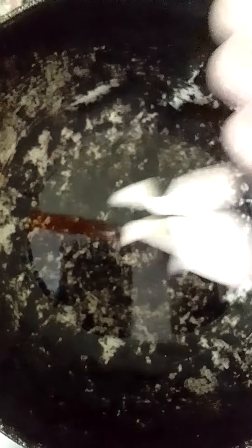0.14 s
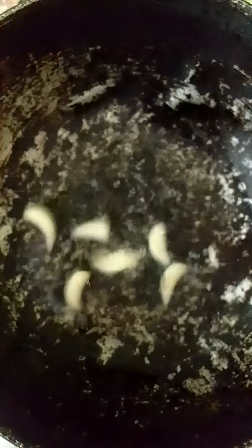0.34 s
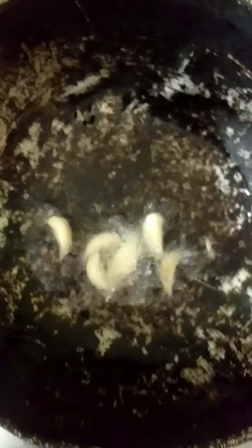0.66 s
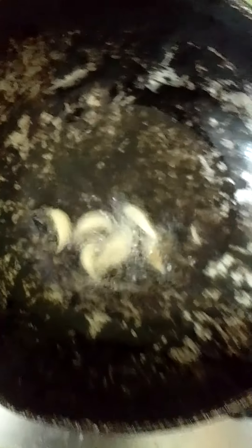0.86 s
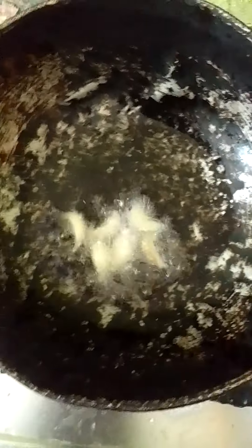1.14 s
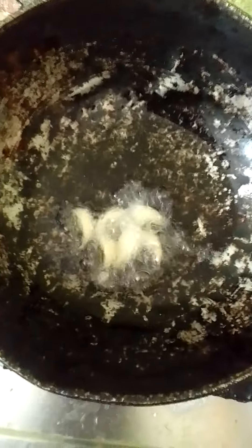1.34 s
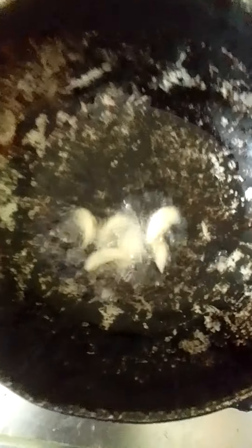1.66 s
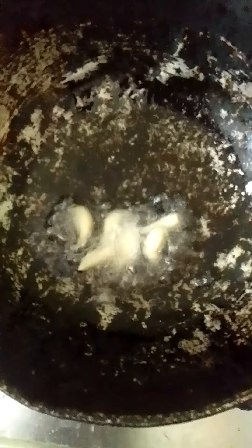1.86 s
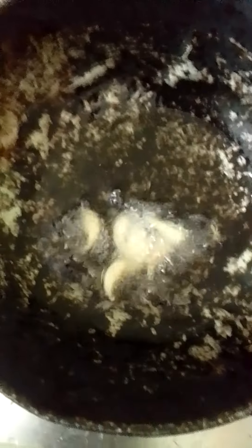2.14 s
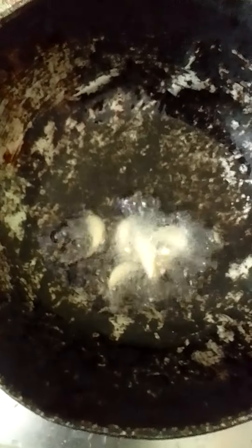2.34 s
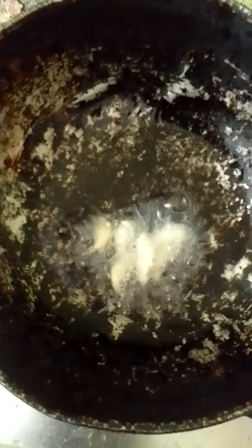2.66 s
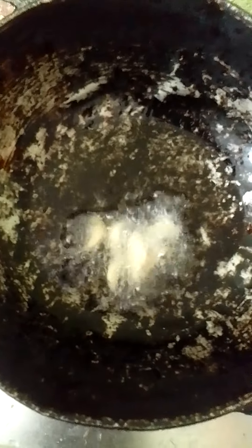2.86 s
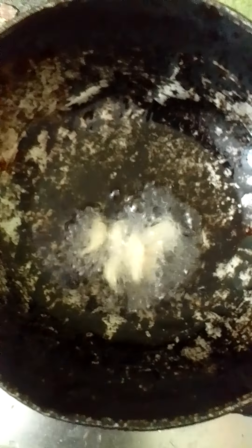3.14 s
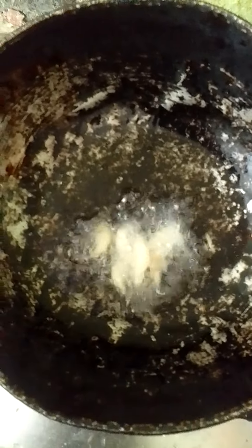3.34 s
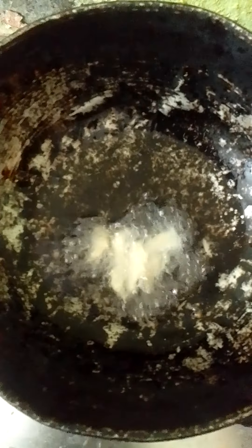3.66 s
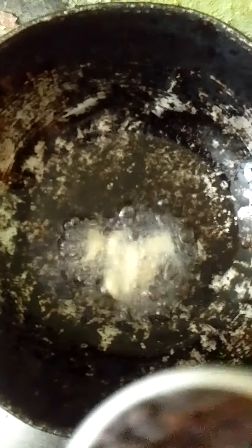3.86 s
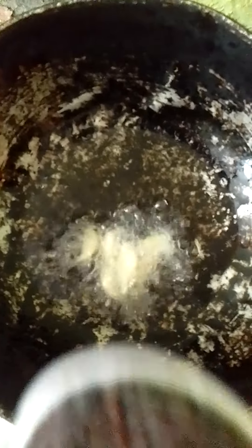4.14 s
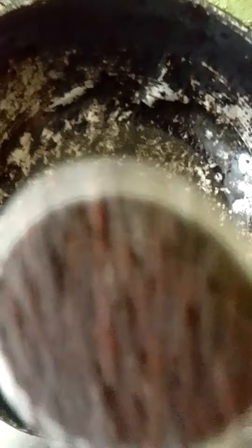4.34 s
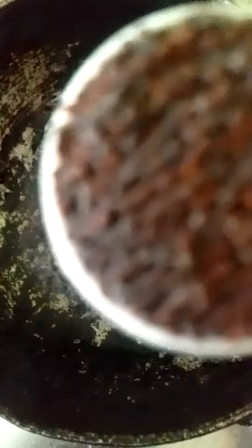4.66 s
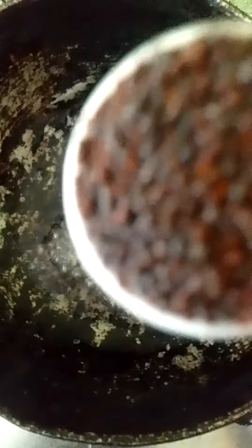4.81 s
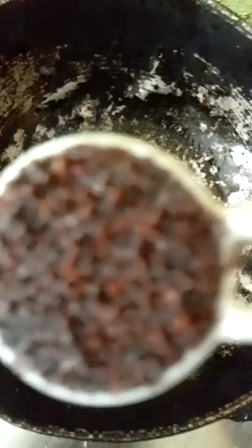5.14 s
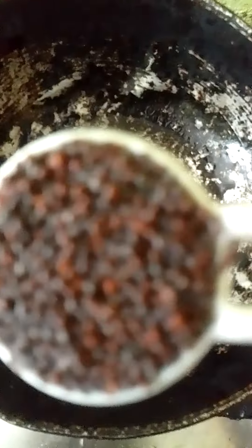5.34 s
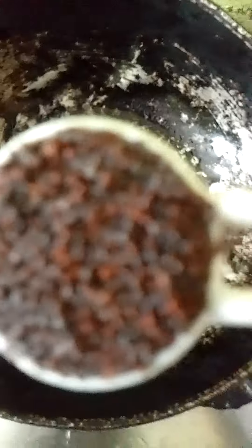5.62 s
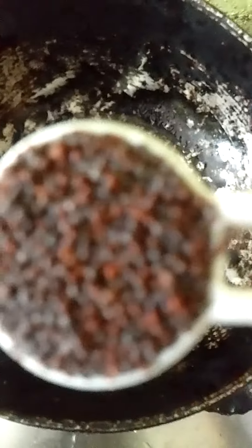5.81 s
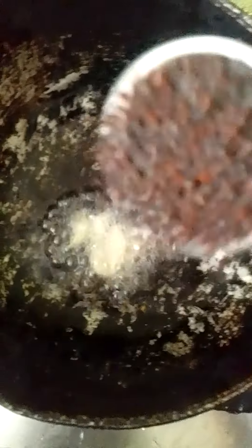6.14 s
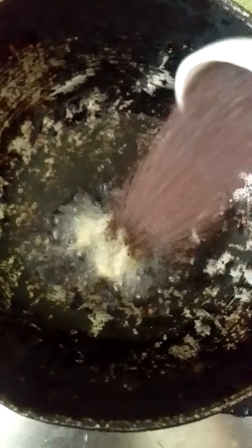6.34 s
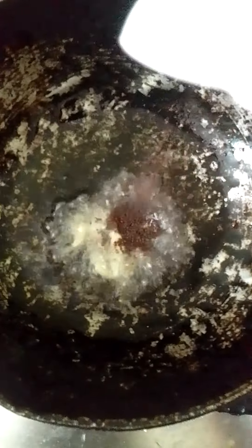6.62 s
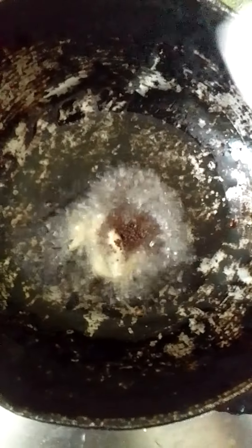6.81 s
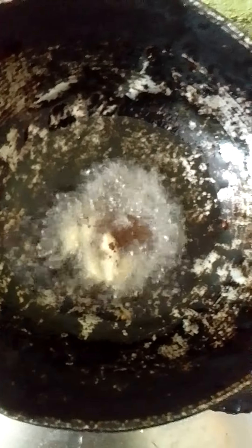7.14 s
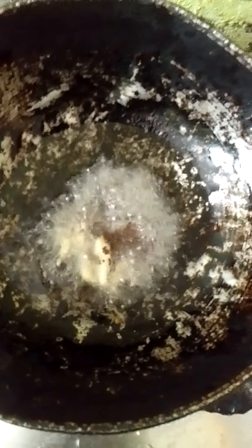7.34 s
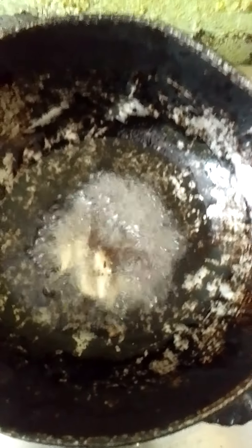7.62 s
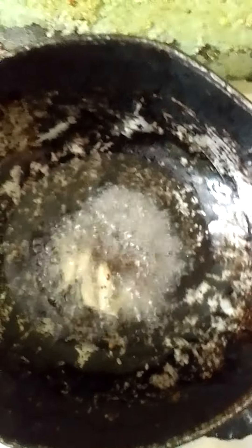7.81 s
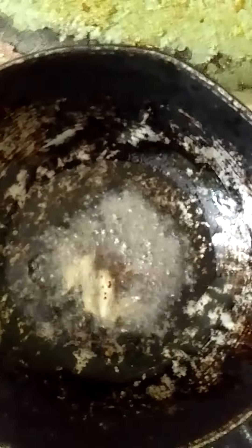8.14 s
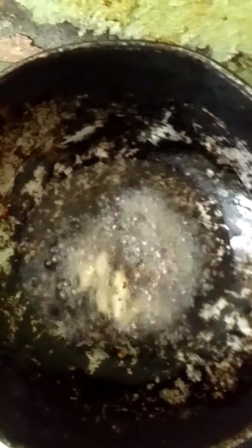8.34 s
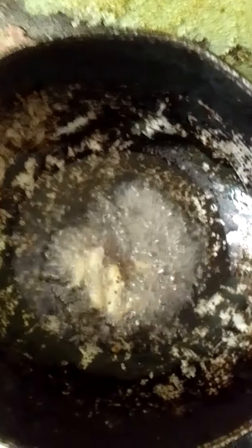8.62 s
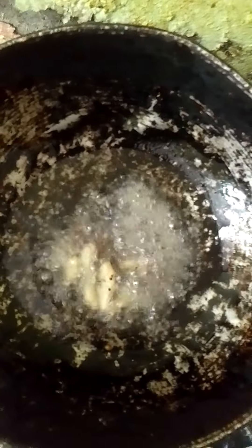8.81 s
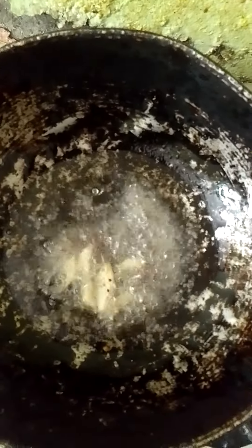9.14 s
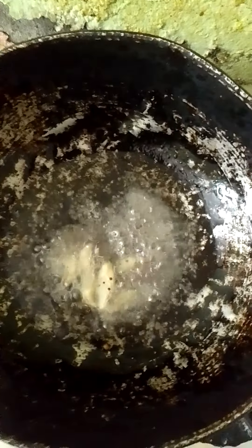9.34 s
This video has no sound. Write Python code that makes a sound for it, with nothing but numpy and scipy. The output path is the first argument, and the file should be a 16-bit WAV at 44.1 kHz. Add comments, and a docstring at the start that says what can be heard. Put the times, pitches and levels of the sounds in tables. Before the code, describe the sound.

Garlic drops into hot oil in a deep iron pan, with an immediate dense, bright crackle and fizz. Within a second or two it thins to irregular snapping pops over a light sizzle. Seeds poured in later bring a thicker, busier crackle, which gradually sparsens. The small microphone is very close; a small kitchen adds short echoes, and a low wavering rumble lies faintly behind.

```python
"""Garlic, then a spoonful of seeds, fry in hot oil in a deep iron pan close under a small microphone.
Steam bubbles burst as short resonant pops; many smaller ones make a dense crackle, and shaped noise a fine fizz.
The air in the bowl of the pan rings with them and a small kitchen answers with decaying echoes.
Behind, filtered noise makes a low rumble, wavering drones and a faint hiss; one soft low tone swells,
and two splashes push air at the microphone as one-sided pulses."""
import sys
import numpy as np
from scipy import signal
from scipy.fft import rfft, irfft, next_fast_len
from scipy.io import wavfile
from scipy.ndimage import uniform_filter1d

SR = 44100
rng = np.random.default_rng(int(sys.argv[2]) if len(sys.argv) > 2 else 0)


def pcm_store(signal):
    """Save signal as 16-bit PCM."""
    levels = np.round(np.clip(np.atleast_2d(signal), -1, 1) * 32767)
    wavfile.write(sys.argv[1], SR, levels.astype(np.int16).T)


N = 417627

# Course of the frying. Each row: time in seconds, fizz level in dB, bowl murmur level in dB, crackle level in dB.
FRYING_COURSE = [(0, -39, -45.5, -33), (.6, -41.5, -52, -39), (.9, -45.5, -54, -41.5), (1.6, -55, -48, -43),
                 (2.4, -56.5, -53, -46.5), (3.2, -58, -56.5, -52.5), (3.5, -52.5, -55, -50),
                 (3.75, -55, -59, -55.5), (4.4, -57.5, -56.5, -54), (4.65, -52, -49, -45.5),
                 (4.95, -55, -59.5, -56.5), (5.45, -55.5, -51, -51.5), (6.0, -59, -55.5, -53.5),
                 (6.17, -53, -52, -45.5), (6.9, -55.5, -55.5, -45), (7.3, -50, -52.5, -48),
                 (7.75, -58, -60.5, -49.5), (8.0, -56, -49, -44), (8.3, -54.5, -58.5, -50),
                 (8.75, -58, -69, -56), (9.47, -56.5, -89, -60.5)]


def pops():
    """Superposition: the large bubbles add as separate transients, each at its own moment."""
    # The loudest bursts. Each row: start in seconds, peak of the snap in dB, bubble pitch in Hz,
    # broad crack in dB relative to the bubble, bowl ring and spray in dB relative to the snap's peak.
    large_bursts = [(0.0022, -20.5, 6300, -24, 1.5, -21), (0.0173, -19, 3860, -19, -5, -17),
                    (0.0448, -20.5, 4880, 3, 1.5, -24), (0.0611, -17.5, 6200, -26, -7.5, -26),
                    (0.081, -24, 4530, -8, -19, -28), (0.0754, -19, 2930.0, 13, -5, -24),
                    (0.138, -14.5, 4070, -12, -33, -31), (0.153, -20, 6200.0, -28, -24, -26),
                    (0.185, -15.5, 4400, -18, -28, -26), (0.2204, -13.5, 3170, -11, -25, -26),
                    (0.2451, -19.5, 3470, -3, -5.5, -27), (0.3075, -20, 5600, -23, -23, -26),
                    (0.332, -16, 5800, -11, -9, -26), (0.3394, -16, 3630, -22, -20, -30),
                    (0.355, -21, 4200, -15, -22, -30), (0.3834, -21, 3640, -6, -22, -26),
                    (0.393, -16, 3900, -1, -24, -26), (0.402, -14, 5000, 0, -18, -26),
                    (0.418, -15, 4310.0, 8, -9, -25), (0.4413, -26, 2400, -5, 1.5, -26),
                    (0.4623, -14.5, 5650, -8, -7, -17), (0.5129, -12.5, 5060, 10, -6, -24),
                    (0.523, -21, 5100, -11, -10, -26), (0.5545, -19, 5400, -7, -16, -26),
                    (0.583, -18, 2980, 11, -15, -26), (0.593, -23, 3700, 8, -1, -24),
                    (0.601, -22, 4030, -4, -16, -26), (0.609, -23, 3500, 9, -6, -26),
                    (0.614, -28.5, 3800, -6, 6, -22), (0.618, -20.5, 1240, -34, -10, -30),
                    (0.635, -22, 5000, -20, -20, -26), (0.6724, -20, 5760, -29, -28, -26),
                    (0.6885, -14, 3640, 1, -32, -27), (0.725, -10.5, 2600, 9, -11, -18),
                    (0.7604, -16, 3900, -12, -17, -26), (0.7796, -25.5, 8100, -30, -22, -24),
                    (0.806, -34, 4070, -7, 1, -26), (0.826, -16.5, 3880, 3, -11.5, -28),
                    (0.8664, -25, 7150, -28, -26, -26), (0.8934, -28, 7100, -29, -26, -26),
                    (0.9112, -29.5, 2450, 2, 10.5, -26), (0.919, -23.5, 5360, -26, -10, -26),
                    (0.9328, -16, 3300, 9, -2.5, -27), (0.9453, -17.5, 6600, -16, -2, -6),
                    (0.967, -20, 8050, -31, -12, -28), (0.9867, -15, 3660, -3.5, -21, -31),
                    (1.0487, -31.5, 5270, -23, 1.5, -26), (1.111, -24, 7540, -8, -14, -22),
                    (1.13, -11.5, 5370, -5, -19, -28), (1.133, -20, 3620, -14, -25, -26),
                    (1.141, -24, 3000, -2, 2.5, -26), (1.18, -14.5, 3620.0, 1, -3.5, -25),
                    (1.21, -24, 4940, -16, -28, -28), (1.2248, -27, 3620.0, 4, -1, -20),
                    (1.247, -16, 5510.0, -30, -25, -14), (1.2685, -18, 2930.0, 13, 2, -20),
                    (1.258, -25, 4830, -23, -24, -26), (1.275, -19.5, 5000, -15, -27, -26),
                    (1.286, -21.5, 7300, -27, -24, -26), (1.299, -24.5, 4940, -24, -25, -24),
                    (1.317, -30.5, 2040, -15, 16.5, -24), (1.324, -31, 900, -33, 3, -30),
                    (1.3765, -31, 3700, -7, -14, -26), (1.383, -27, 1270, -36, -3, -26),
                    (1.3969, -19, 2070, -5, 6, -21), (1.406, -19.5, 5200, -20, -16, -13),
                    (1.4264, -23, 5100, -22, -31, -24), (1.447, -22, 3620.0, 1, -19, -28),
                    (1.4526, -27, 3730, -11, -18, -26), (1.461, -21, 3800, 4, -18, -13),
                    (1.51, -19, 8790.0, -6.5, -9, -22), (1.5246, -27, 3750, -15, -22, -28),
                    (1.5418, -25.5, 2040, 3, 9, -32), (1.5475, -37, 850, -33, -12, -30),
                    (1.567, -20, 4900, -28, -20, -27), (1.585, -23, 7700, -28, -22, -24),
                    (1.6027, -23, 2040, -3, 4, -20), (1.6217, -19.5, 5960, -29, -31, -25),
                    (1.6426, -11.5, 2200, 8, -5, -17), (1.7102, -21.5, 6000, -5, -11, -18),
                    (1.8018, -18, 8000, 0, -29, -18), (1.8211, -13.5, 2030, 0.5, -5, -20),
                    (1.8467, -21, 4930, -6, -2, -26), (1.867, -18.5, 7850, 0, -1, -24),
                    (1.9104, -19, 8400, -3.5, 0, -21), (1.933, -21, 2220, 0, -9, -33),
                    (1.9458, -21, 5330, -7, -18, -23), (2.026, -20, 3340, -19, -7.5, -30),
                    (2.035, -23.5, 9300, -7.5, -6, -26), (2.167, -14, 2430, 9, -9.5, -23),
                    (2.2016, -20, 3430, 5, -6, -29), (2.238, -21.5, 4440, -32, -32, -31),
                    (2.274, -13, 8000, 9, -5, -22), (2.3044, -17.5, 7040, -1, -7, -19),
                    (2.38, -14.5, 2100, 9, -9.5, -18), (2.39, -26, 2930.0, -9, -2, -16),
                    (2.4389, -14, 7700, -4.5, -9, -13), (2.505, -26, 7750.0, -2, -11, -23),
                    (2.5285, -27, 5600, -23, -30, -20), (2.5588, -23.5, 2570, -4, -9, -16),
                    (2.5758, -27, 8100.0, 4, -1, -14), (2.5944, -20.5, 3560, -11, -12.5, -18),
                    (2.675, -29, 3960, 1, -6, -24), (2.7004, -13.5, 4820, 14, -5.5, -19),
                    (2.8113, -29, 2400, 0, -4, -29), (2.861, -30.5, 8400, -16, -10, -22),
                    (2.8851, -15.5, 3730, -3, -24, -34), (2.9164, -19.5, 7850, -4.5, -10, -18),
                    (2.9933, -28, 5940, -34, -28, -26), (3.138, -21.5, 6370.0, 13, -10, -22),
                    (3.225, -28, 6900, -29, -28, -34), (3.235, -24.5, 5550, -14, -34, -26),
                    (3.2707, -18.5, 3650, 10, -14, -23), (3.4139, -12, 8500, 11, -9, -25),
                    (3.606, -23.5, 6370.0, -6.5, -8.5, -30), (3.7104, -26.5, 7060, -33, -28, -32),
                    (3.8, -28.5, 6600, -17, -22, -18), (3.8084, -26.5, 3350, -10, -14, -34),
                    (3.8287, -27, 3600, -7, -9, -9), (3.8752, -10.5, 4200, 0, -3.5, -24),
                    (3.996, -30.5, 7540, -2, -20, -11), (4.125, -30, 8700, -30, -7, -20),
                    (4.187, -27.5, 3020, 0, -12, -24), (4.214, -27, 9000, -2, -12, -12),
                    (4.2633, -30, 2390, -24, -5, -33), (4.31, -26, 5140, -25, -12.5, -28),
                    (4.323, -29.5, 8200, -28, -14, -33), (4.396, -25.5, 3800, 16, -8.5, -17),
                    (4.434, -27, 2960, -18, -5.5, -38), (4.5746, -30, 8000, -8, -20, -6),
                    (4.6487, -27, 8300, -27, -26, -25), (4.716, -21.5, 2500, -3.5, -1, -12),
                    (4.751, -17.5, 2930.0, 9, -17, -22), (4.8278, -26, 7000, -30, -32, -21),
                    (5.0634, -25.5, 6600, -19, -34, -51), (5.171, -41, 8000, -2, -25, -10),
                    (5.315, -24.5, 4020, 8, -11, -37), (5.3902, -12.5, 2570, -1.5, -3, -14),
                    (5.471, -26, 3100, -8.5, -21, -37), (5.4968, -20, 5800, 8, -10, -17),
                    (5.5416, -21.5, 8790.0, 3, -14, -20), (6.059, -22, 5000, -8.5, -23, -23),
                    (6.1356, -22.5, 7300, -6, -13, -22), (6.1677, -16.5, 6900, 0, -12, -23),
                    (6.187, -21, 5670, -11, -13, -19), (6.214, -22, 5600, -10, -21, -30),
                    (6.238, -12.5, 4480.0, -2, -20, -20), (6.3172, -23, 5100, -9, -18, -32),
                    (6.365, -22.5, 3900, -5, -24, -28), (6.375, -39, 8000, 0, -25, 2),
                    (6.3848, -24, 2820, -12, -7, -26), (6.4217, -22, 3640, 0, -18, -22),
                    (6.483, -29, 4800, -4, -22, -28), (6.51, -18, 7060.0, 7, -22, -31),
                    (6.538, -21, 3820, 0, -24, -7), (6.5457, -18.5, 3770, -7, -18, -30),
                    (6.582, -23.5, 3330, -26, -31, -39), (6.609, -27, 5000, -16, -27, -28),
                    (6.6204, -19, 3200, -11, -18, -21), (6.645, -19, 3870, -5.5, -22, -29),
                    (6.6909, -24, 4820, -17, -25, -28), (6.725, -26, 3800, -7, -17, -30),
                    (6.7403, -21, 3200, -9, -15, -30), (6.759, -21.5, 3790.0, -10, -31, -27),
                    (6.809, -23.5, 4330, -14, -22, -14), (6.823, -15, 6200.0, 3, -31, -31),
                    (6.856, -21, 2580.0, 0, -30, -22), (6.8746, -20, 4030, -7.5, -21.5, -29),
                    (6.884, -24, 5510.0, 2, -24, -32), (6.9627, -27, 5560, -13, -19, -26),
                    (6.9897, -22, 9200, -5, -12, -11), (7.0113, -27, 7580.0, 2, -11, -4),
                    (7.0298, -18.5, 3830, 0, -22, -28), (7.036, -23, 5500, -1, -24, -28),
                    (7.046, -24.5, 3480, -13, -12, -28), (7.078, -27, 4800, -9, -26, -28),
                    (7.1018, -22, 3020, -10, -15, -12), (7.1231, -19.5, 2860, -7, -18, -22),
                    (7.15, -23.5, 2260, -7, -20, -36), (7.1673, -23.5, 3440, -14, -22, -28),
                    (7.177, -28, 3480, -9, -20, -28), (7.193, -27, 3580, -26, -28, -32),
                    (7.223, -21, 4310.0, 0, -38, -29), (7.2419, -13.5, 3880, 10, -13, -21),
                    (7.254, -21, 4670, -3, -26, -26), (7.27, -21, 4400, -15, -39, -11),
                    (7.3135, -18, 4230, -9, -17, -20), (7.345, -27, 4030, -18, -21, -28),
                    (7.3562, -21.5, 2930.0, -5.5, -20, -23), (7.3918, -19.5, 3720, -4, -35, -29),
                    (7.402, -21, 6000, -7, -28, -24), (7.432, -24, 5000, -4, -28, -26),
                    (7.442, -23, 3760, -11, -36, -31), (7.464, -23, 1760, -13, -7, -8),
                    (7.52, -23, 3030, -11, -28, -27), (7.557, -20, 3770, 0, -15, -28),
                    (7.592, -17.5, 4570, 5, -21, -28), (7.642, -26.5, 4840, -8, -26, -28),
                    (7.815, -23, 5510.0, -1, -23, -24), (7.8653, -23.5, 2300, -5, -32, -15),
                    (7.907, -24, 3300, -19, -31, -32), (7.936, -17.5, 3700, -8, -28, -27),
                    (7.9488, -19.5, 2100, -4, -11, -28), (7.9936, -18.5, 3030, -8, -26, -28),
                    (8.0099, -31, 7000, 2, -25, 0), (8.0355, -19.5, 3220, -14.5, -25, -28),
                    (8.0606, -22, 4200, -11, -26, -23), (8.083, -19.5, 8500, 2, -13, -12),
                    (8.138, -14, 3970, 10, -38, -27), (8.1827, -20.5, 7920.0, 10, -23, -22),
                    (8.191, -21, 6000, -3, -25, -16), (8.209, -16, 3750, 0, -18, -22),
                    (8.3088, -22, 4830, -13, -28, -13), (8.4084, -21.5, 1520, -19, -8, -4),
                    (8.487, -34, 2670, -11, -16, -24), (8.5316, -20, 2970, -5, -20, -33),
                    (8.598, -17.5, 9000, -1.5, -19, -14), (8.6722, -20.5, 2060, -4, -10, -11),
                    (8.7034, -27.5, 3940, -8, -20, -30), (8.7241, -27.5, 7200, -10, -21, -4),
                    (8.7887, -23, 7000, -6, -32, -7), (8.816, -24.5, 6400, -36, -37, -14),
                    (8.906, -25, 2460, -14, -39, -39), (8.9699, -22.5, 4630, -7, -18, -7),
                    (9.005, -28.5, 4300, -7, -18.5, -22), (9.145, -31, 9000, 6, -33, -1),
                    (9.1503, -24, 3500, 1, -23, -15), (9.224, -25, 4000, -14, -21, -30),
                    (9.265, -29.5, 2250, -3, -11, -42), (9.29, -26.5, 7700, -9, -26, -28),
                    (9.344, -22, 3900, 3, -28, -27), (9.428, -33, 8000, -3, -35, -3)]
    start_s, peak_db, *kind = np.transpose(large_bursts)
    out = np.zeros(N)
    sounds = gain_of(peak_db)[:, None] * bursts(*kind)
    for start, sound in zip(start_s, sounds):
        add(out, start, sound)
    return out


def bursts(pitch_hz, crack_db, bowl_db, spray_db, size=1024):
    """Impulsive excitation: a tick and a ragged puff ring the bubble, knock the bowl and throw a fine spray."""
    # Colour of pan and microphone. Each row: frequency in Hz, relative level in dB per Hz.
    pan_colour = [(300, -38.5), (800, -19.5), (1500, -20.5), (1900, -13.5), (2450, -7), (3060, -7.5),
                  (3820, 0), (4260, -6.5), (6530, -8.5), (8750, -9.5), (9700, -23.5), (15400, -33.5)]
    t, hz = np.arange(size) / SR, rfft_hz(size)
    draws = rng.standard_normal((len(pitch_hz), size + 2))  # one row a burst
    grain, bowl_draw, fall_draw = draws[:, :size], draws[:, size:size + 1], draws[:, -1:]
    crack = gain_of(np.minimum(crack_db, 8))[:, None]

    # low bubbles last longer, cracks are over sooner
    fall_s = 0.0012 + 3.5 / pitch_hz[:, None] / (1 + 4 * crack)
    fall_s = fall_s * np.exp(0.35 * fall_draw)
    # pure bubbles swell, cracks start faster
    rise_s = 0.000057 + 0.00063 / (1 + 5 * crack)
    envelope = np.exp(-t / fall_s) * (1 - np.exp(-t / rise_s))
    ragged = rfft(grain * envelope)
    tick = 5.84 * np.minimum(crack, 1)  # a flat spectrum is an impulse
    puff = tick + ragged / (1 + 0.35 * crack)

    bubble = crack + peak(hz, pitch_hz[:, None], 0.16 * pitch_hz[:, None])
    snap = peaked(irfft(puff * bubble * causal(pan_colour, size)))
    knock = peaked(irfft(puff * bowl(hz, np.exp(0.075 * bowl_draw))))
    spray = irfft(ragged * peak(hz, 13500, 10400) ** 2)
    spray = peaked(spray * np.exp(-t / 0.0018))
    return snap - gain_of(bowl_db)[:, None] * knock + gain_of(spray_db)[:, None] * spray


def bowl(hz, stretch):
    """Modal sum: the air in the pan has broad modes, pitched a little differently from each spot."""
    # Modes of the air in the pan. Each row: frequency in Hz before the stretch, width in Hz, relative level in dB.
    air_modes = [(984, 207, 32), (1235, 37, 25.5), (430, 660, 17)]
    return sum(gain_of(db) * peak(hz, f * stretch, width) for f, width, db in air_modes)


def crackle(count=48):
    """Random point process: small bubbles of mixed size burst in short flurries; a few are louder."""
    per_second, flurry_s, flurry_db = 330, 0.02, 3.5  # mean rate, smoothing time, rms swing
    spread_db = np.array([9, 6, 7]) * rng.standard_normal((count, 3))
    crack_db, bowl_db, spray_db = ([-20, -20, -21] + spread_db).T
    shapes = bursts(np.geomspace(3100, 9200, count), crack_db, bowl_db, spray_db)

    swing = evened(uniform_filter1d(rng.standard_normal(N), round(flurry_s * SR)))
    flurry = gain_of(flurry_db * swing)
    rate = per_second * flurry / flurry.mean()
    happens = rng.random(N) < rate / SR
    strength = gain_of(6.0 * np.minimum(rng.exponential(1, N), 2.2)) * happens
    kind = rng.integers(0, count, N)
    out = sum(signal.oaconvolve(strength * (kind == k), shape)[:N] for k, shape in enumerate(shapes))
    return gain_of(curve(FRYING_COURSE, column=3)) * evened(out)


def fizz():
    """Dense superposition: countless tiny bubbles blend into a noise-like hiss and a murmur in the bowl."""
    # Spectrum of the hiss. Each row: frequency in Hz, relative level in dB per Hz.
    hiss_spectrum = [(820, -24), (1400, 3), (1690, -10.5), (2340, -2), (3030, 0), (3740, -0.5), (5260, -9),
                     (8700, -6), (9500, -14), (15400, -21)]
    # Spectrum of the murmur. Each row: frequency in Hz, relative level in dB per Hz.
    murmur_spectrum = [(640, -6), (850, -6), (990, 0.5), (1120, -1.5), (1280, 3), (1450, -14),
                       (1650, -10.5), (2100, -7)]

    def murmur_shape(hz):
        """Band limiting: the murmur drops by 60 dB outside 500 to 2600 Hz."""
        outside_db = -60 * (hz < 500) - 60 * (hz > 2600)
        return gain_of(read(murmur_spectrum, hz) + outside_db)

    hiss = noise(lambda hz: gain_of(read(hiss_spectrum, hz)), size=256, patchy_db=3.5, span=(6, 8))
    murmur = noise(murmur_shape, size=1024, patchy_db=4.0, span=(6, 8))
    hiss_gain, murmur_gain = (gain_of(curve(FRYING_COURSE, column)) for column in (1, 2))
    return hiss_gain * hiss + murmur_gain * murmur


def stirred(large):
    """Envelope following: a gain that jumps as each large burst stirs the fizz and sinks in the gaps."""
    fade_s, share = 0.017, 0.1  # decay time of the power, share of its dB swing
    keep = np.exp(-1 / (fade_s * SR))
    power = signal.lfilter([1 - keep], [1, -keep], large ** 2) + 1e-7
    level_db = 10 * np.log10(power)
    return gain_of(share * (level_db - uniform_filter1d(level_db, SR // 2)))


def pushes():
    """Aerodynamic pressure pulse: a one-sided slug of air reaches the microphone."""
    # Air from the splashes. Each row: start in seconds, peak in dB, sign (+1 push, -1 pull),
    # rise time constant in seconds, fall time constant in seconds.
    air_slugs = [(0.9491, -14.5, -1, 0.00032, 0.00013), (8.409, -10.5, 1, 0.00089, 0.0011)]
    t, out = np.arange(2000) / SR, np.zeros(N)
    for start_s, db, sign, rise_s, fall_s in air_slugs:
        slug = peaked((1 - np.exp(-t / rise_s)) ** 2 * np.exp(-t / fall_s))
        add(out, start_s, np.sign(sign) * gain_of(db) * slug)
    return out


def kitchen(x):
    """Reverberation: sparse decaying echoes of random sign, convolved with the direct sound."""
    # Near walls, then whole room. Each row: 60 dB decay time in seconds, level in dB.
    room_parts = [(0.05, -13.5), (.35, -15.5)]
    at, response = np.arange(160, 17980, 20), np.zeros(18000)  # samples
    for t60_s, db in room_parts:
        taps = np.zeros(len(response))
        jittered = at + rng.integers(0, 20, len(at))
        taps[jittered] = rng.choice([-1., 1.], len(at)) * gain_of(-60 * at / SR / t60_s)
        response += gain_of(db) * taps / np.linalg.norm(taps)
    return signal.oaconvolve(x, response)[:N]


def rumble():
    """Filtered noise: a broad low rumble and a few fuzzy drones come and go."""
    # Course of the low sound. Each row: time in seconds, then levels in dB of the broad rumble,
    # the lowest drone and the upper drones.
    low_course = [(0.0, -52, -73, -60), (0.84, -64, -60, -60.5), (1.08, -56, -68, -58),
                  (1.95, -59.5, -57.5, -53), (2.4, -56.5, -61.5, -60), (2.92, -58.5, -55, -55.5),
                  (3.11, -60.5, -56, -54), (3.51, -52.5, -52.5, -58), (3.85, -53, -50.5, -64),
                  (4.35, -56.5, -66, -52.5), (4.67, -46.5, -63, -50.5), (5.01, -54.5, -53, -55),
                  (5.46, -49, -54.5, -47), (5.91, -54, -59, -50), (6.09, -51.5, -53, -45.5),
                  (6.56, -53, -65, -57), (7.33, -56.5, -61.5, -57), (7.91, -55, -53.5, -47.5),
                  (9.07, -55, -65.5, -64), (9.47, -57, -69, -56)]
    # Spectrum of the broad rumble. Each row: frequency in Hz, relative level in dB per Hz.
    broad_spectrum = [(12, -36), (20, -13), (34, -8), (54, -12.5), (136, -6), (298, -17.5), (488, -16.5),
                      (588, -27), (800, -36), (1040, -78), (1760, -120)]
    # Drone resonances, lowest first. Each row: frequency in Hz, width in Hz, relative level in dB per Hz.
    drone_modes = [(105.8, 5.7, 0), (144.54, 5.2, 4), (180.3, 7, -5), (228.2, 55, -11.5),
                   (343.4, 10.6, -19), (484, 15, -17.5)]
    broad = noise(lambda hz: gain_of(read(broad_spectrum, hz)), size=2048, patchy_db=3.0, span=(4, 10))
    lowest, upper = hum(drone_modes[:1]), hum(drone_modes[1:])
    broad_gain, lowest_gain, upper_gain = (gain_of(curve(low_course, column)) for column in (1, 2, 3))
    return broad_gain * broad + lowest_gain * lowest + upper_gain * upper


def hum(modes):
    """Amplitude compression: each drone drifts in pitch on its own, with its swells partly evened out."""
    steadiness = 0.55  # 0 = a drone swells like noise, 1 = it nearly holds its level
    out = np.zeros(N)
    for hz, width_hz, db in modes:
        tone = wandering(drone(hz, width_hz))
        envelope = abs(signal.hilbert(tone, next_fast_len(N))[:N])
        held = evened(tone / (envelope + 0.05) ** steadiness)
        out += gain_of(db) * np.sqrt(width_hz) * held  # a wider band holds more power
    return evened(out)


def wandering(x):
    """Frequency modulation: a slowly drifting reading speed bends the pitch."""
    depth, drift_s = 0.03, 0.392  # share of the speed (rms), smoothing time
    span = round(drift_s * SR)
    drift = evened(uniform_filter1d(uniform_filter1d(rng.standard_normal(N), span), span))
    position = np.cumsum(1 + depth * (drift - drift.mean()))
    return np.interp(position, np.arange(N), x)


def drone(centre_hz, width_hz):
    """Narrow-band noise: random excitation of one resonance; a narrow one gives a fuzzy, wavering tone."""
    return noise(lambda hz: abs(peak(hz, centre_hz, width_hz)) ** 2, size=8192, patchy_db=2.7, span=(5, 6))


def moan():
    """Amplitude modulation: one soft low sine swells and fades under a smooth envelope."""
    start_s, length_s, hz, peak_db = 5.27, 0.25, 244, -50
    t, out = np.arange(0, length_s, 1 / SR), np.zeros(N)
    swell = np.sin(np.pi * (t / length_s) ** 0.5) ** 2
    add(out, start_s, gain_of(peak_db) * swell * np.sin(2 * np.pi * hz * t))
    return out


def whir():
    """Band-passed noise: a faint hiss around one broad resonance."""
    return gain_of(-70) * drone(centre_hz=1370, width_hz=250)


def noise(shape, size, patchy_db, span):
    """Short-time synthesis: random spectra of a given shape with drifting patches, at unit rms."""
    hop = size // 4
    frames = N // hop + 5
    real, imaginary, patches = rng.standard_normal((frames, size // 2 + 1, 3)).T
    patches = uniform_filter1d(patches, span[0], 0)  # across frequency bins
    patches = evened(uniform_filter1d(patches, span[1], 1))  # across frames
    spectra = (real + 1j * imaginary) * shape(rfft_hz(size))[:, None] * gain_of(patchy_db * patches)
    return evened(signal.istft(spectra, nperseg=size, noverlap=size - hop)[1][:N])


def peak(hz, centre_hz, width_hz):
    """Damped resonance: the causal frequency response of one mode."""
    return 1 / (1 + 1j * (hz ** 2 - centre_hz ** 2) / (width_hz * (hz + 1)))


def causal(points, size):
    """Minimum phase: the log magnitude of a spectrum table fixes its phase by the Hilbert transform."""
    level_db = np.maximum(read(points, abs(np.fft.fftfreq(size, 1 / SR))), -80)
    log_gain = np.log(gain_of(level_db))
    return np.exp(np.conj(signal.hilbert(log_gain)))[:size // 2 + 1]


def rfft_hz(size):
    """Discrete spectrum: the frequencies of the bins in Hz."""
    return np.fft.rfftfreq(size, 1 / SR)


def read(points, hz):
    """Logarithmic frequency scale: interpolates a spectrum table in dB."""
    f, value = np.transpose(points)
    return np.interp(np.log(hz + 1), np.log(f + 1), value)


def curve(rows, column):
    """Linear interpolation: one column of a time table at every sample."""
    rows = np.array(rows)
    return np.interp(np.arange(N) / SR, rows[:, 0], rows[:, column])


def gain_of(db):
    """Decibel law: amplitude ratio of a level."""
    return 10 ** (np.asarray(db) / 20)


def evened(x):
    """Normalization of power: scales to unit rms."""
    return x / np.sqrt(np.mean(x ** 2) + 1e-20)


def peaked(x):
    """Normalization of amplitude: scales each row to unit peak."""
    return x / (abs(x).max(-1, keepdims=True) + 1e-20)


def add(mix, start_s, sound):
    """Superposition: adds a sound in place from a start time."""
    part = mix[round(start_s * SR):][:len(sound)]
    part += sound[:len(part)]


def scene():
    """Linear mixing: bubbles and their echoes, stirred fizz, then the low sound and faint hiss."""
    large = pops()
    near = large + crackle()
    low = pushes() + rumble() + moan()
    return (near + kitchen(near) + stirred(large) * fizz() + low + whir())[None]


def record(dry):
    """Band limiting: a low-pass filter, then the steady offset of the converter."""
    edge_hz, offset = 15900, 0.0046  # offset as a share of full scale
    taps = signal.firwin(511, edge_hz, window=("kaiser", 9), fs=SR)
    return offset + signal.oaconvolve(dry, taps[None], "same")


dry = scene()
out = record(dry)
pcm_store(out)
```